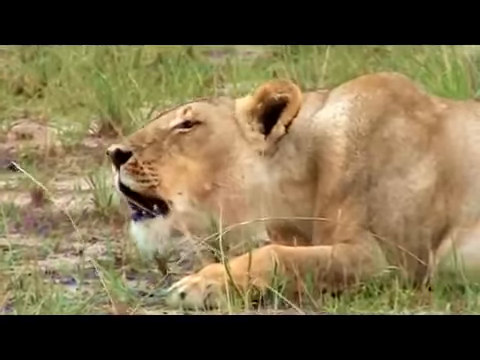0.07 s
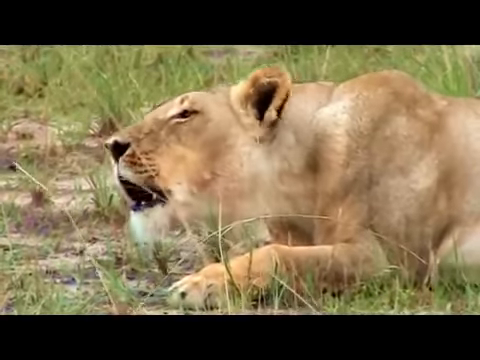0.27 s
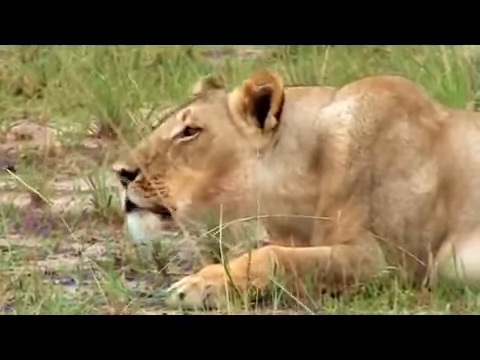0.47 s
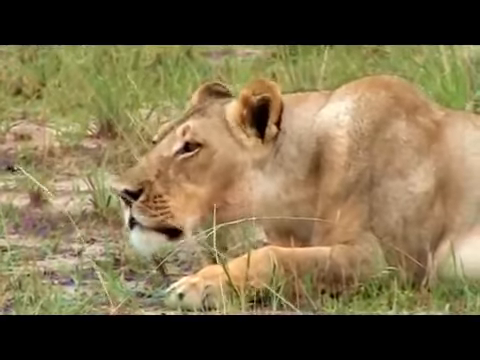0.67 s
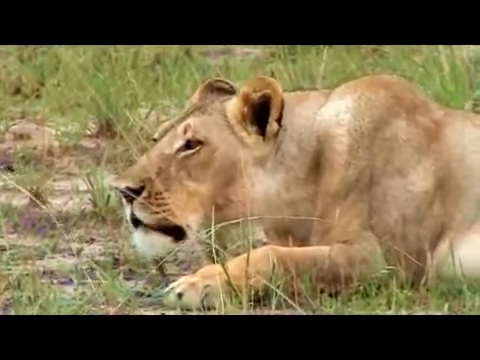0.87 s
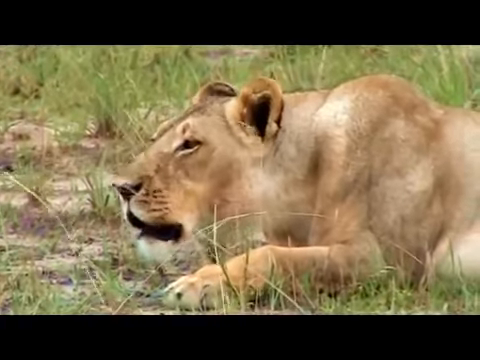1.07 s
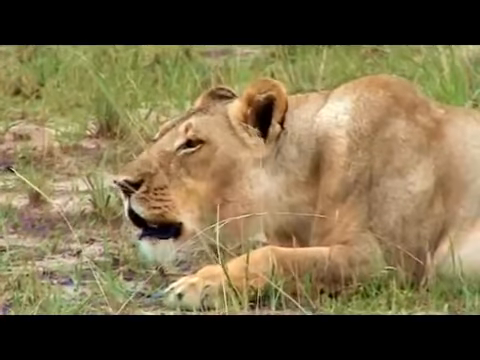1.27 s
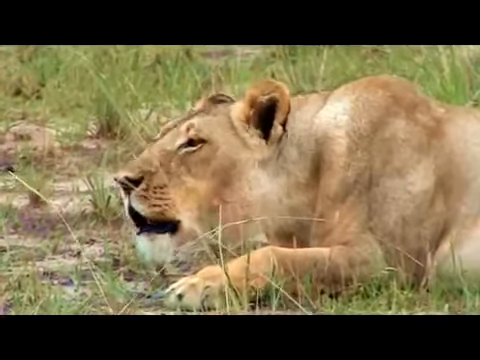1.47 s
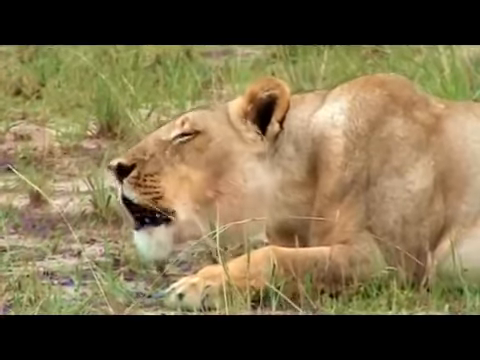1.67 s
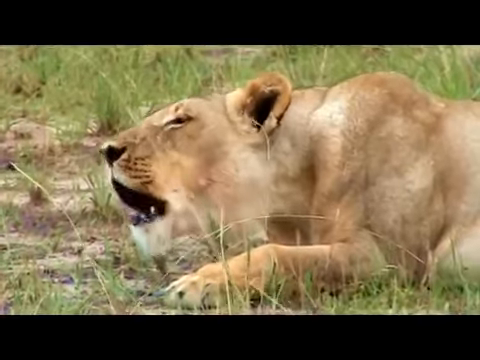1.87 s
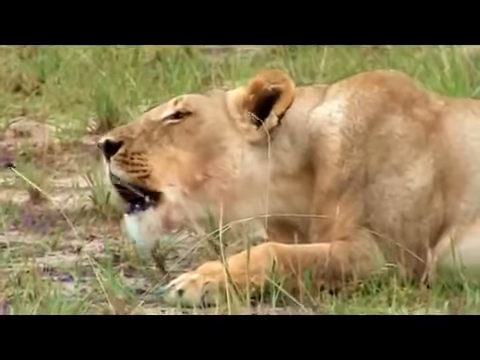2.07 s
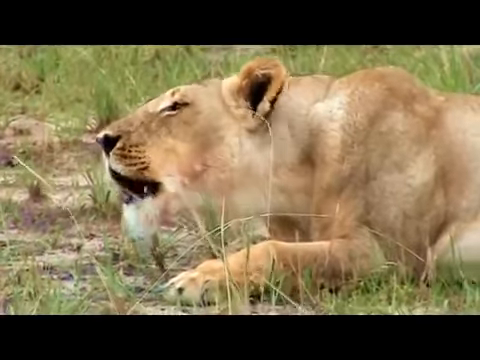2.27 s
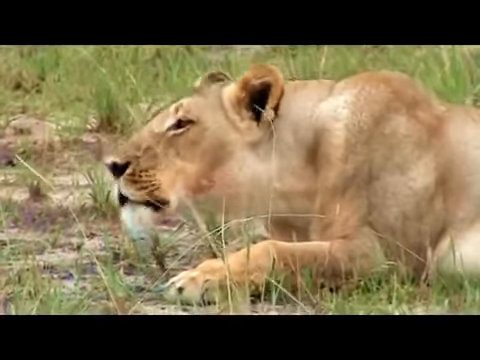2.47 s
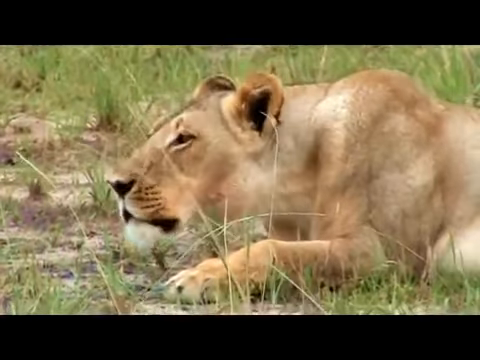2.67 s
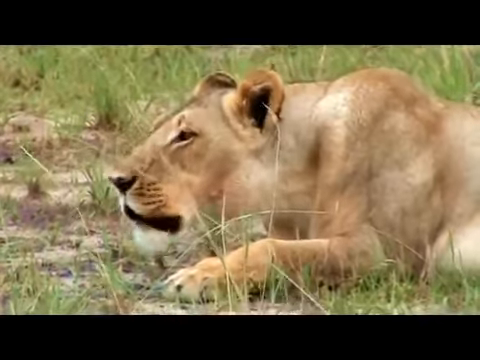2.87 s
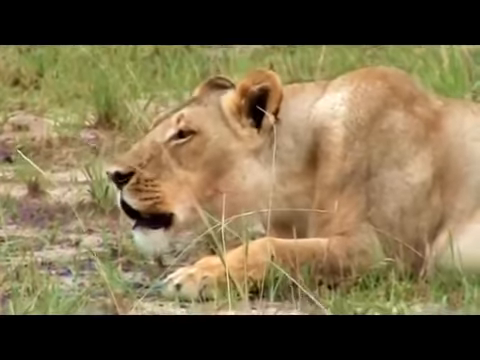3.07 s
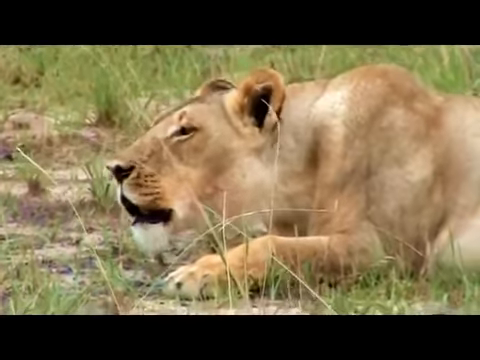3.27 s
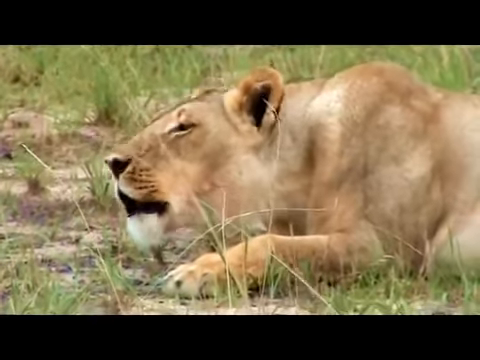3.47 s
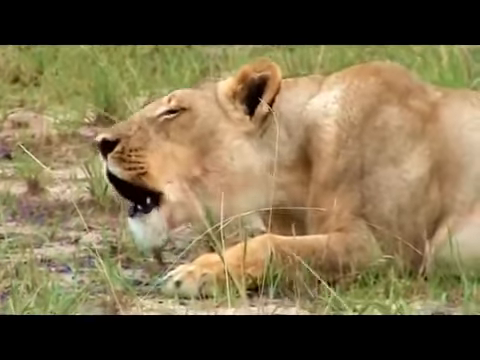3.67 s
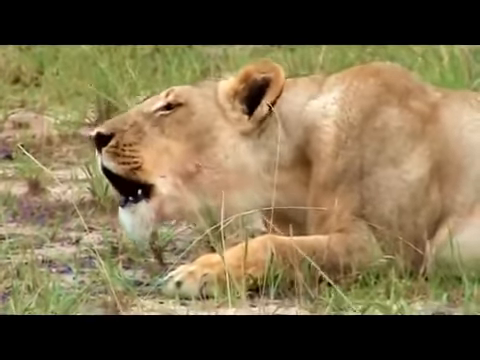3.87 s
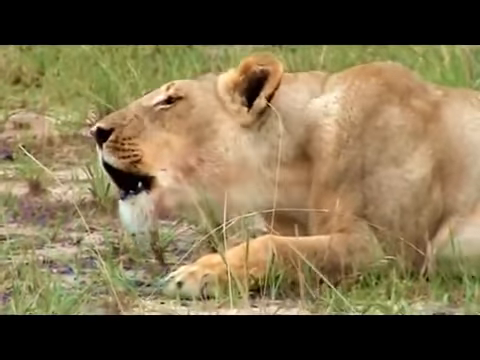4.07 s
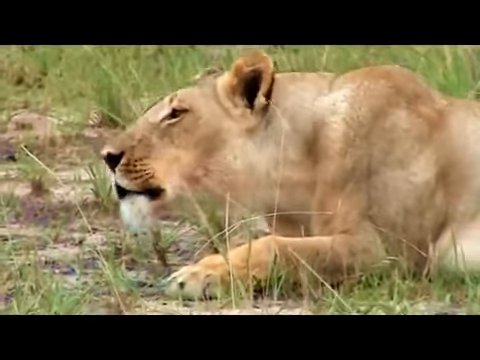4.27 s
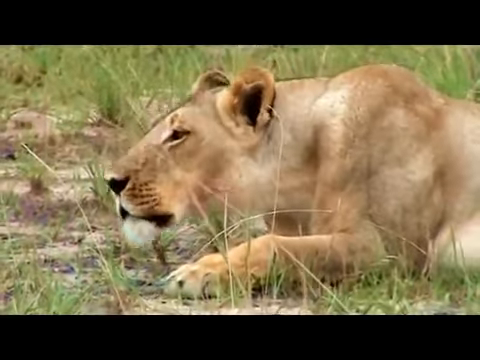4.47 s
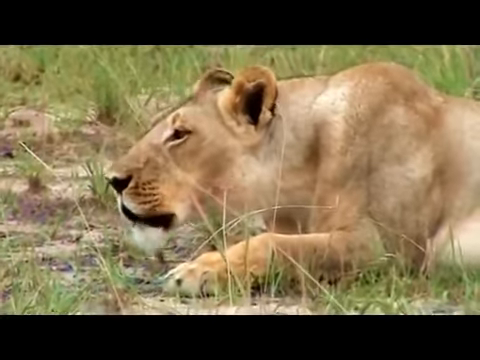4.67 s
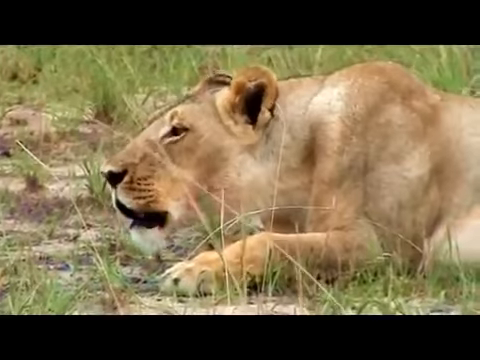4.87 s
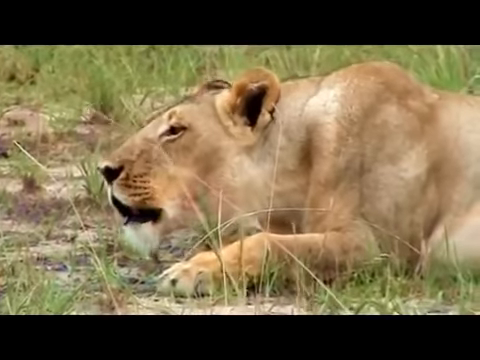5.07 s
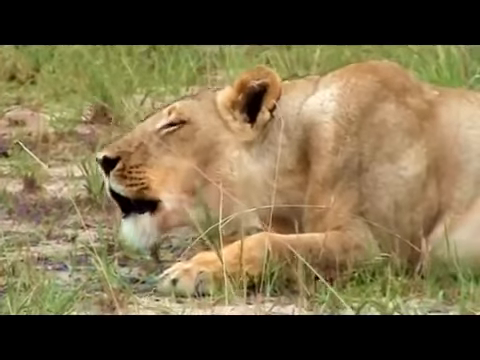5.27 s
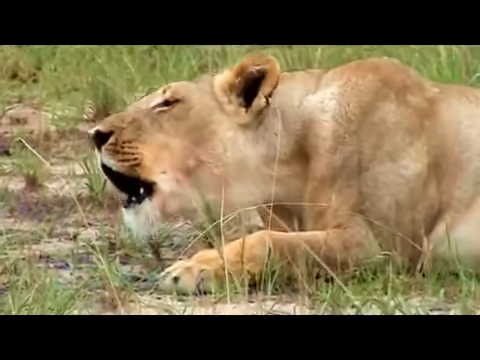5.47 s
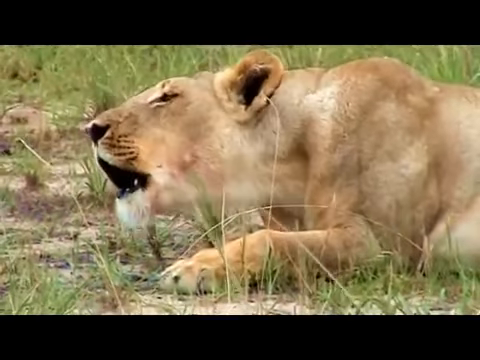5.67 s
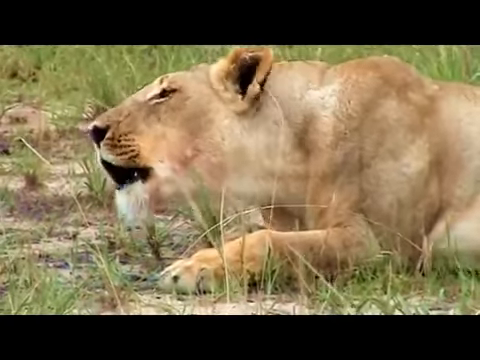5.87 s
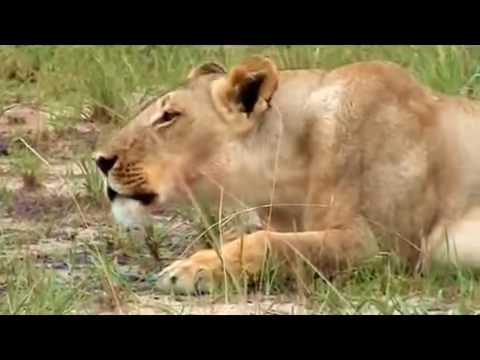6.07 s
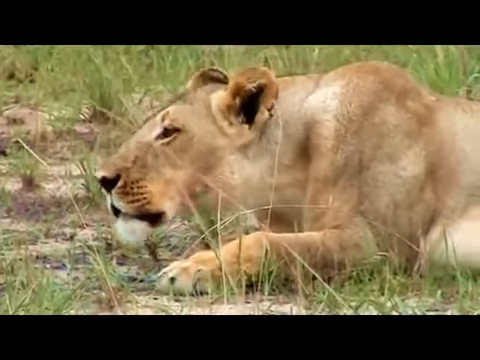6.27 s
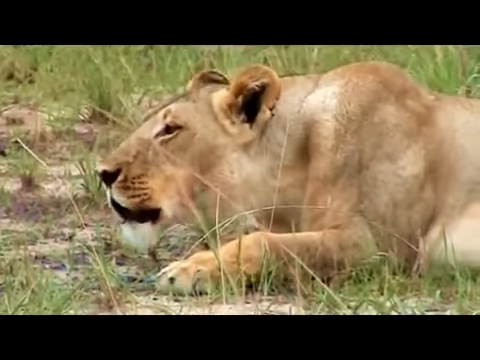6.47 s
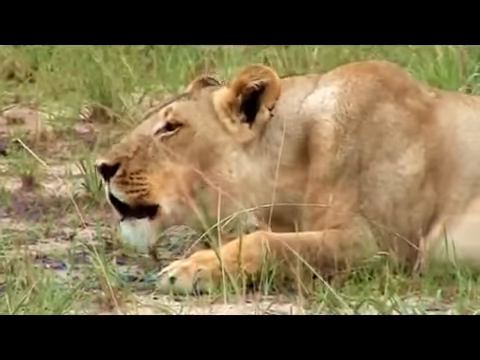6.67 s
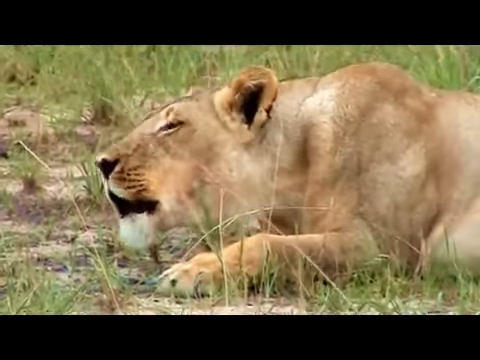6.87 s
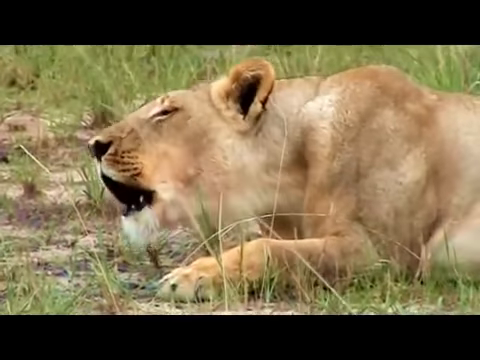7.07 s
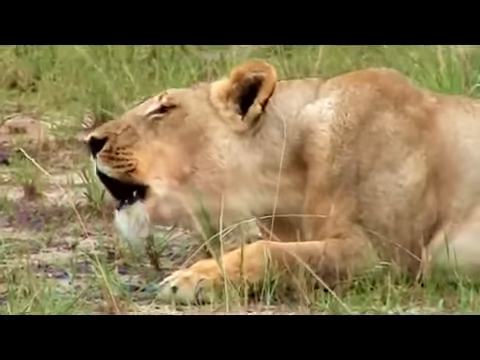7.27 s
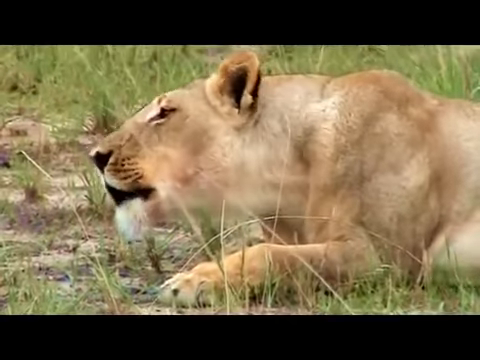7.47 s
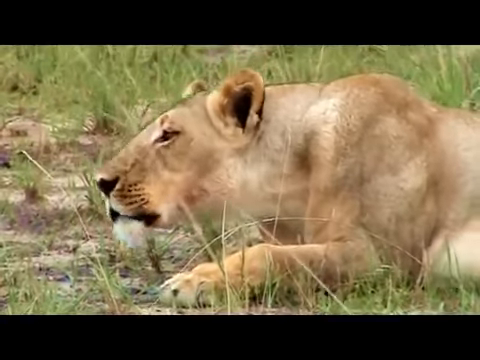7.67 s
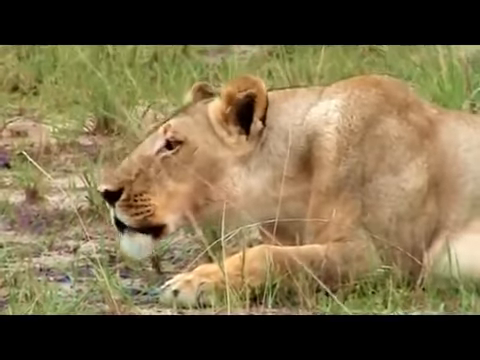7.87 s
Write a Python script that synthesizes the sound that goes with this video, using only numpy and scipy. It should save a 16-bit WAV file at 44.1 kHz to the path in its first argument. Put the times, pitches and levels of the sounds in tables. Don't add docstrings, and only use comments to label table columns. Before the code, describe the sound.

Close stereo outdoor sound of a lioness in grassland: five separate, forceful roars under a second each, roughly every two seconds. The pitch sinks as each throaty moan breaks into gritty, breathy rasp and a chest thud, leaving a short natural echo. The final one is shortest and roughest. Quiet gaps hold soft air noise, shimmering insects, slight equipment hum, tiny bird notes and one woody knock.

```python
import sys
import numpy as np
from scipy import signal
from scipy.fft import rfft, irfft, next_fast_len
from scipy.io import wavfile
from scipy.ndimage import uniform_filter1d, minimum_filter1d

SR = 44100
rng = np.random.default_rng(int(sys.argv[2]) if len(sys.argv) > 2 else 0)


def field_ratio(decibels):
    return 10 ** (np.asarray(decibels, dtype=float) / 20)


def unload_audio(sound):
    columns = np.transpose(np.atleast_2d(sound))
    steps = np.round(np.clip(columns, -1, 1) * 32767)
    wavfile.write(sys.argv[1], SR, steps.astype(np.int16))


N = 348831


def roar(span, moan, steady, breath):
    # time_s, depth_db, half_length_s
    breaks = [(.299, 10.5, 0.017), (.352, 16, 0.047), (.524, 11, 0.026), (1.937, 11.5, 0.014),
              (1.98, 12, 0.02), (2.329, 15, 0.031), (2.411, 11, 0.021), (2.5, 12.5, 0.02),
              (3.815, 10.5, 0.018), (3.897, 17, 0.031), (4.196, 3.5, 0.081), (4.286, 6.5, .04),
              (5.567, 6.5, .025), (5.635, 9, 0.018), (5.941, 16, 0.023), (7.205, 8.5, 0.039),
              (7.295, 13, 0.024), (7.467, 11, 0.016), (7.571, 8, 0.013)]
    start, end = span
    t = np.arange(start, end, 1 / SR)
    n = len(t)
    hz, moan_db = columns(moan, t)
    hz = uniform_filter1d(hz, size=900)
    moan_db = moan_db - bumps(t, *np.transpose(breaks))
    rough, throat_db, bright_db, hiss_db, thump_db = effort(t, steady, breath)

    turns = np.cumsum(hz * (1 + (0.0037 + .02 * rough) * drift(n, hz=45))) / SR
    swing = np.sqrt(2) * np.sin(2 * np.pi * turns) * field_ratio(moan_db + 1.6 * rough * drift(n, hz=30))
    swing = signal.sosfiltfilt(signal.butter(3, 112, "high", fs=SR, output="sos"), swing)

    overtones = clear_overtones(hz, turns, bright_db)
    slaps, puffs = fold_slaps(hz)
    chaos = throat_and_mouth(slaps, puffs, hz, breath[1] - t, bright_db)
    body = field_ratio(throat_db) * (np.sqrt(1 - rough) * overtones + np.sqrt(rough) * chaos)
    palate_db = 0.26 * (throat_db + bright_db - 19) + 0.62 * (hiss_db - 1.5)
    body += field_ratio(palate_db) * np.sqrt(.06 + .94 * rough) * palate(slaps, puffs)
    body = signal.sosfilt(signal.butter(4, 190, "high", fs=SR, output="sos"), body)

    blown = field_ratio(hiss_db + 1.8 * drift(n, hz=49)) * breath_hiss(slaps, puffs)
    chest = field_ratio(thump_db) * chest_thump(n)
    fade_in = ((t - start) / 0.037) ** 2 + (start == 0)
    fade = np.clip(np.minimum(fade_in, (end - t) / 0.2), 0, 1)
    return (swing + body + blown + chest) * fade


def clear_overtones(hz, turns, bright_db):
    # pitch_hz, level_db
    strengths = [(300, -1), (700, -4.5), (850, -3.5), (980, -9), (1130, -11.5), (1300, -14.5),
                 (1500, -21.5), (1750, -20), (2050, -36), (2300, -31), (2600, -26.5), (2900, -45.5),
                 (3200, -32), (3500, -52.5)]
    k = np.arange(2, 19)[:, None]
    upper = np.clip((k * hz - 680) / 100, 0, 1)
    tops = field_ratio(read(strengths, k * hz))
    tops /= np.sqrt(((tops * (1 - upper)) ** 2).sum(0) / 2)
    waver_db = [2.2 * drift(len(hz), hz=8) + .09 * j * drift(len(hz), hz=90) for j in k]
    tops *= field_ratio(upper * (bright_db + 4.0) + waver_db)
    return (tops * np.cos(2 * np.pi * (k * turns + rng.random(k.shape)))).sum(0)


def fold_slaps(hz):
    n = len(hz)
    beats = np.cumsum(hz * np.exp(.11 * drift(n, hz=50))) / SR
    slaps = (np.diff(np.floor(beats), prepend=0) > 0) * field_ratio(5.1 * rng.standard_normal(n))
    puffs = (0.29 + np.exp(-(beats % 1) / 1.2)) * rng.standard_normal(n)
    return slaps, puffs


def throat_and_mouth(slaps, puffs, hz, breath_left_s, bright_db):
    # pitch_hz, width_hz, level_db
    throat = [(228.3, 59, -7), (435.6, 93, -7), (543.3, 53, -10.5), (637.3, 29, -13.5)]
    # pitch_hz, width_hz, level_db
    mouth = [(826.4, 68, 1), (955, 71, -5), (1226, 170, -8.5)]
    drive = evened(slaps) + .42 * evened(puffs)
    jaw = (uniform_filter1d(hz, size=3000) / 165) ** .25
    gaping = jaw * (1 + 0.077 * np.clip(1 - breath_left_s / 0.32, 0, 1))
    throat_ring = steadied(ring(throat, gaping, drive), .8)
    return throat_ring + field_ratio(bright_db) * steadied(ring(mouth, jaw, drive), .8)


def palate(slaps, puffs):
    # pitch_hz, width_hz, level_db
    modes = [(1560, 260, 0), (1830, 260, -3), (2250, 300, -6), (2590, 280, -3), (3130, 320, -6)]
    return patchy(steadied(ring(modes, 1, .55 * evened(slaps) + evened(puffs)), .7), depth_db=3)


def breath_hiss(slaps, puffs):
    # pitch_hz, level_db (per Hz)
    hiss_colour = [(2120, -35), (3600, -7), (4180, -11), (4460, -7), (4860, -11.5), (5810, -2),
                   (6900, -2.5), (7400, -4), (7970, -5.5), (10900, -12), (12200, -22.5), (13000, -33)]
    return patchy(coloured(puffs + 0.12 * evened(slaps), hiss_colour), depth_db=3.0)


def chest_thump(n):
    shake = np.diff(rng.standard_normal(n), prepend=0)
    return steadied(resonate(shake, 52, 36), .6)


def effort(t, steady, breath):
    calm_db = (-9.5, -7.5, -8.5)
    strain_db = (1, 3.5, 4.5)
    lag_s = (0.0011, 0.0033, 0.053)
    spent_db_per_s = (234.5, 278.5, 345)
    # time_s, throat_db, air_db
    gusts = [(.012, 14, -6.5), (0.059, 4, -1.5), (.21, 2.5, 4), (.307, 3.5, 5), (.412, 0.5, -5.5),
             (0.45, 6.5, 6.5), (0.491, -5.5, 8), (1.986, 3, 5.5), (2.097, 10.5, 14), (2.345, 11, 8.5),
             (2.389, -7.5, 1.5), (2.455, 1.5, 0.5), (2.515, 1, 5.5), (3.89, 6.5, 6.5), (4.197, 8, 3.5),
             (4.226, 5, 4), (4.257, -7, -4), (4.338, 0.5, 4), (5.621, 0, 6), (5.639, 2.5, 0),
             (5.702, 0.5, -10.5), (5.962, 3.5, 1), (6.011, -2.5, 0), (6.067, 4.5, 1.5), (7.25, 0, 2.5),
             (7.383, -3.5, -11), (7.512, 0.5, 1), (7.55, 0, -4.5), (7.615, -5, -3), (7.659, 5, 5.5)]
    # time_s, level_db, half_length_s
    flares = [(0.085, 4.5, 0.058), (.225, 4.5, 0.029), (0.344, -3, 0.025), (.475, 3.5, 0.086),
              (1.953, -3.5, .04), (2.255, 3, 0.033), (2.39, 3, 0.016), (2.477, 3, 0.032),
              (3.814, 4.5, 0.051), (4.104, 5.5, 0.045), (4.251, 5, .03), (4.32, 3, 0.024),
              (5.56, 4.5, 0.047), (5.976, 3.5, 0.044), (6.088, 7, 0.024), (7.304, 3, 0.029),
              (7.522, 4.5, 0.021), (7.667, 6, 0.088)]
    settle_s, tear_s, onset_rough = .05, .032, .85
    open_s, shut_db, gust_s = 0.069, -18, 0.038
    base_throat_db, base_mouth_db, base_hiss_db = -20.5, -28.5, -48.5
    (settled, tears, least), (opens, spent, push_db, thump_db) = steady, breath

    rough = np.interp(t, [settled - settle_s, settled, tears, tears + tear_s], [onset_rough, least, least, 1])
    flow_db = push_db + shut_db * np.maximum(1 - (t - opens) / open_s, 0)
    along = np.clip(1 - (spent - t) / .65, 0, 1)
    throat, mouth, hiss = (flow_db + calm * (1 - rough) + strain * along - fall * np.maximum(t - spent - lag, 0)
                           for calm, strain, lag, fall in zip(calm_db, strain_db, lag_s, spent_db_per_s))

    at, shake_db, blow_db = np.transpose(gusts)
    blow = bumps(t, at, blow_db, gust_s)
    throat_db = base_throat_db + throat + bumps(t, at, shake_db, gust_s)
    mouth_db = base_mouth_db + mouth + .55 * blow + bumps(t, *np.transpose(flares))
    hiss_db = base_hiss_db + hiss + blow

    late = t - spent - 0.049
    thump = thump_db + np.where(late < 0, 197.5 * late, -96.5 * late)
    return rough, throat_db, mouth_db - throat_db, hiss_db, np.maximum(thump, -54)


def ground(x):
    size = next_fast_len(N + SR)
    hz = np.fft.rfftfreq(size, 1 / SR)
    delay_s = np.array([[.00026], [.00038]])
    bounce = 1 + 0.14 * np.exp(-2j * np.pi * hz * delay_s)
    near = irfft(rfft(x, size) * bounce / 1.087, size)[:, :N]
    scatter = rng.standard_normal(900) * field_ratio(-60 * np.arange(900) / SR / 0.063)
    band = signal.butter(3, [650, 9500], "band", fs=SR, output="sos")
    scatter = signal.sosfilt(band, scatter / np.linalg.norm(scatter))
    return near + field_ratio(-11) * np.array([[1], [-1]]) * signal.oaconvolve(x, scatter)[:N]


def far(x):
    # pitch_hz, time_to_fall_60_db_s
    bush_decays = [(200, 0.5), (700, 0.15), (2000, 0.51), (6000, 0.033)]
    # pitch_hz, time_to_fall_60_db_s
    tree_decays = [(60, 2.8), (170, 1.26), (300, 0.78), (700, 0.65), (2000, 1.3), (6000, 0.14)]
    rasp = signal.sosfilt(signal.butter(4, 300, "high", fs=SR, output="sos"), x)
    bushes = field_ratio(-23) * echo(rasp, bush_decays, first=600)
    return bushes + field_ratio(-35.5) * echo(x, tree_decays, first=2000)


def echo(x, decays, first):
    taps = np.zeros((2, 2 * SR))
    at = np.arange(first, 2 * SR - 20, 20)
    at = at + rng.integers(0, 20, (2, len(at)))
    np.put_along_axis(taps, at, rng.choice([-1., 1.], at.shape), 1)
    taps[1] = .75 * taps[0] + .66 * taps[1]
    hz, t, z = signal.stft(taps, SR, nperseg=1024)
    tail = signal.istft(z * field_ratio(-60 * t / read(decays, hz)[:, None]), SR, nperseg=1024)[1]
    return signal.fftconvolve(x[None], tail / np.linalg.norm(tail[0]), axes=1)[:, :N]


def knocks():
    # time_s, level_db
    hits = [
        (6.29, -25),
        (6.2931, -26),
        (1.033, -54),
        (.605, -46),
    ]
    # pitch_hz, time_to_fall_60_db_s, level_db
    twig = [(720, .035, 0), (1130, .03, -2), (1600, .014, -8), (3500, .007, -12), (6500, .005, -16)]
    t, out = np.arange(2000) / SR, np.zeros(N)
    knock = sum(field_ratio(db - 60 * t / t60) * -np.sin(2 * np.pi * hz * t) for hz, t60, db in twig) / 2
    for s, db in hits:
        add(out, s, field_ratio(db) * knock)
    return out


def birds():
    out = np.zeros((2, N))
    for s, start_hz, end_hz, length, db, lead_db in songs():
        u = np.linspace(0, 1, round(length * SR))
        glide_hz = start_hz * (end_hz / start_hz) ** u
        note = np.sin(2 * np.pi * np.cumsum(glide_hz) / SR) * np.sin(np.pi * u) ** .6
        note *= 1 + .8 * drift(len(u), hz=300)
        for delay, echo_db in ((0, 6.5), (.009, 0), (.021, -6)):
            add(out, s + delay, note * field_ratio(db + echo_db + lead_db * np.array([[.5], [-.5]])))
    return out


def songs():
    # start_s, level_db, left_lead_db
    chip_times = [(.816, -63, 7), (4.596, -65, 3), (4.846, -62.5, 10), (5.098, -62.5, 8), (5.358, -66, 19)]
    # start_hz, end_hz, length_s
    chip_shape = (5300, 2270, .019)
    # start_s, gap_s, note_count, level_db
    trill_times = [(.924, .028, 4, -68.5), (1.75, .027, 3, -70), (2.944, .0235, 5, -67),
                   (5.288, .04, 2, -68.5), (6.533, .027, 4, -69), (6.8, .04, 2, -72), (7.8, .03, 1, -67.5)]
    # start_hz, end_hz, length_s
    trill_shape = (5400, 3800, .0145)
    # start_s, start_hz, end_hz, length_s, level_db
    whistles = [(3.14, 5600, 4630, 0.16, -82), (3.471, 2880, 2510, 0.092, -75),
                (6.284, 2630, 2480, 0.096, -69), (6.462, 2340, 2186, 0.13, -71),
                (6.792, 2850, 2700, .037, -78), (6.971, 4170, 3590, 0.13, -72.5)]
    chips = [(s, *chip_shape, db, lead_db) for s, db, lead_db in chip_times]
    trills = [(s + gap * i, *trill_shape, db, 2) for s, gap, notes, db in trill_times for i in range(notes)]
    return chips + trills + [(*row, 1) for row in whistles]


def air():
    # pitch_hz, level_db (per Hz)
    air_colour = [(12, -23.5), (20, -8), (85, -11.5), (163, 1), (350, -9), (542, -8.5), (604, -8),
                  (986, -8.5), (1100, -11.5), (1950, -14.5), (3550, -20), (5200, -18), (10900, -25),
                  (12400, -31), (13500, -74)]
    # pitch_hz, side_minus_middle_db
    air_side = [(60, -0.5), (150, -6), (360, 5), (890, 2), (2170, 2.5), (5320, -2), (13100, -9.5)]
    frames, hz = N // 512 + 5, np.fft.rfftfreq(2048, 1 / SR)
    a, b, c, d, patches = rng.standard_normal((frames, 1025, 5)).T
    patches = evened(uniform_filter1d(uniform_filter1d(patches, 20, 0), 6, 1))
    mid = a + 1j * b
    side = (c + 1j * d) * field_ratio(read(air_side, hz))[:, None]
    z = np.array([mid + side, mid - side]) * field_ratio(read(air_colour, hz)[:, None] + 1.5 * patches)
    hiss = signal.istft(z, nperseg=2048, noverlap=1536)[1][:, :N]
    return field_ratio(-57.5) * hiss / np.std(hiss.mean(0))


def insects():
    # pitch_hz, width_hz, level_db
    bands = [(5000, 150, -76.5), (5400, 120, -89), (6400, 200, -86.5), (7100, 150, -77.5),
             (10750, 200, -81.5)]
    out = np.zeros((2, N))
    for f, width, db in bands:
        out += [field_ratio(db + 2.3 * drift(N, hz=16)) * evened(resonate(rng.standard_normal(N), f, width))
                for _ in "lr"]
    return out


def camera_hum():
    # pitch_hz, level_db
    tones = [(52, -73), (101, -68), (150, -72), (550, -71), (800, -76.5), (1922, -83)]
    return sum(field_ratio(db) * evened(resonate(rng.standard_normal(N), f, 6)) for f, db in tones)


def ring(modes, opening, drive):
    n, out = len(drive), 0
    for i, (f, width, db) in enumerate(modes):
        level = (-1) ** i * field_ratio(db + 3.6 * drift(n, hz=8))
        out = out + level * evened(resonate(drive, f * opening + 22 * drift(n, hz=8), width))
    return out


def resonate(x, hz, width):
    turn = np.exp(2j * np.pi * np.cumsum(hz * np.ones(len(x))) / SR)
    r = np.exp(-np.pi * width / SR)
    return 2 * (turn * signal.lfilter([(1 - r) ** 2], [1, -2 * r, r * r], x / turn + 1e-18)).real


def patchy(x, depth_db):
    z = signal.stft(x, nperseg=256)[2]
    patches = uniform_filter1d(uniform_filter1d(rng.standard_normal(z.shape), size=4, axis=0), size=9, axis=1)
    return evened(signal.istft(z * field_ratio(depth_db * evened(patches)), nperseg=256)[1][:len(x)])


def steadied(x, share):
    return evened(x / (uniform_filter1d(x ** 2, size=2600) + 1e-9) ** (share / 2))


def drift(count, hz):
    f = np.fft.rfftfreq(count, 1 / SR)
    return evened(irfft(rfft(rng.standard_normal(count)) / (1 + (f / hz) ** 2), count))


def coloured(x, spectrum):
    return irfft(rfft(x) * field_ratio(read(spectrum, np.fft.rfftfreq(x.shape[-1], 1 / SR))), x.shape[-1])


def evened(x):
    return x / np.sqrt(np.mean(x ** 2) + 1e-20)


def read(points, hz):
    f, value = np.transpose(points)
    return np.interp(np.log(hz + 1), np.log(f + 1), value)


def columns(rows, t):
    s, *values = np.transpose(rows)
    return [np.interp(t, s, v) for v in values]


def bumps(t, at, size, half):
    at, size, half = (np.reshape(v, (-1, 1)) for v in (at, size, half))
    return (size * np.clip(1 - abs(t - at) / half, 0, 1)).sum(0)


def add(mix, s, sound):
    part = mix[..., round(s * SR):][..., :sound.shape[-1]]
    part += sound[..., :part.shape[-1]]


def scene():
    # start_s, end_s
    spans = [(0, .66), (1.82, 2.7), (3.71, 4.54), (5.47, 6.26), (7.1, 7.84)]
    # time_s, pitch_hz, level_db
    moans = [
        [(0.0, 220.8, -26.5), (0.135, 193.2, -3.5), (0.239, 179.6, -5), (0.284, 184, -9), (0.33, 158.6, -0.5),
         (0.404, 154.8, -8.5), (0.51, 150, -18.5), (0.659, 162.2, -54.5)],
        [(1.82, 169.9, -43.5), (1.917, 168.1, -12), (2.0, 189.8, -9), (2.09, 207.3, -6.5), (2.285, 179.9, -5.5),
         (2.35, 160.8, -7.5), (2.475, 147.9, -8), (2.696, 156.8, -52.5)],
        [(3.71, 171.9, -58.5), (3.78, 159, -13), (3.84, 165.2, -11.5), (3.9, 193.7, -6), (3.987, 196.9, -5.5),
         (4.16, 180.1, -7.5), (4.339, 152.8, -8), (4.533, 167.7, -63.5)],
        [(5.47, 172.8, -50), (5.552, 158.5, -7.5), (5.61, 163.8, -11.5), (5.655, 189.2, -9),
         (5.739, 193.3, -6.5), (5.92, 180.7, -9), (6.055, 147.5, -10), (6.256, 150, -49)],
        [(7.1, 168.1, -52), (7.19, 161.9, -5), (7.265, 164.2, -10), (7.31, 181.5, -8.5), (7.437, 183.5, -10.5),
         (7.5, 163.4, -10.5), (7.665, 144.1, -13), (7.833, 154, -56)],
    ]
    # start_s, end_s, roughness (0 clear to 1 chaotic)
    steady_stretches = [(.12, .25, .07), (2.025, 2.26, .1), (3.97, 4.125, .06), (5.71, 5.885, .14),
                        (7.34, 7.42, .8)]
    # opens_s, runs_out_s, push_db, chest_thump_db
    breaths = [(-.2, 0.509, 1.5, -20), (1.86, 2.521, 1.5, -24), (3.729, 4.38, 1, -22),
               (5.492, 6.097, 1.5, -25), (7.136, 7.633, 2.5, -24)]
    voice = np.zeros(N)
    for span, moan, steady, breath in zip(spans, moans, steady_stretches, breaths):
        add(voice, span[0], roar(span, moan, steady, breath))
    background = air() + insects() + camera_hum() + birds()
    return ground(voice + knocks()) + field_ratio(4.0) * far(voice) + background


def band_limit(x):
    return signal.sosfilt(signal.butter(12, 13660, fs=SR, output="sos"), x)


def record(dry):
    ceiling = .86
    room = minimum_filter1d(np.minimum(ceiling / (abs(dry).max(0) + 1e-9), 1), size=600)
    held = dry * uniform_filter1d(room, size=500)
    cut = signal.sosfilt(signal.butter(2, 30, "high", fs=SR, output="sos"), held)
    return band_limit(cut)


dry = scene()
out = record(dry)
unload_audio(out)
```